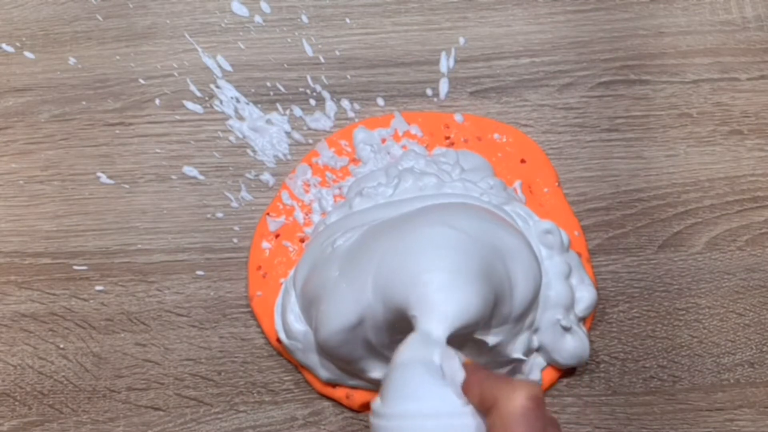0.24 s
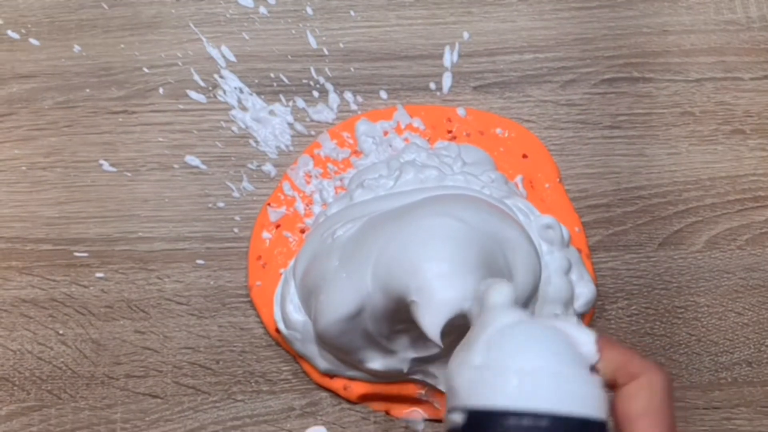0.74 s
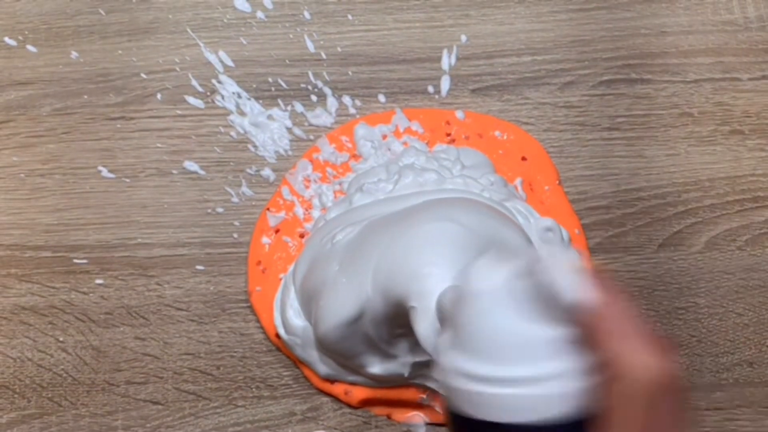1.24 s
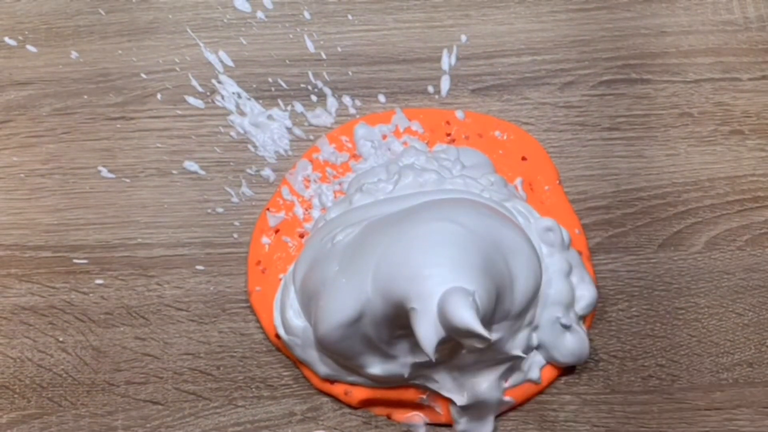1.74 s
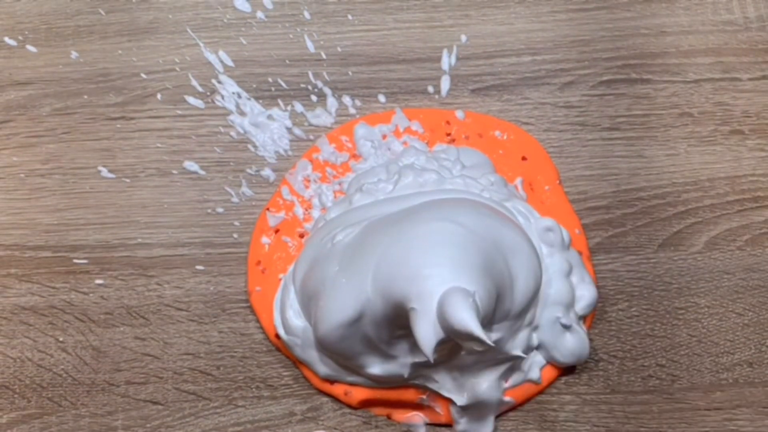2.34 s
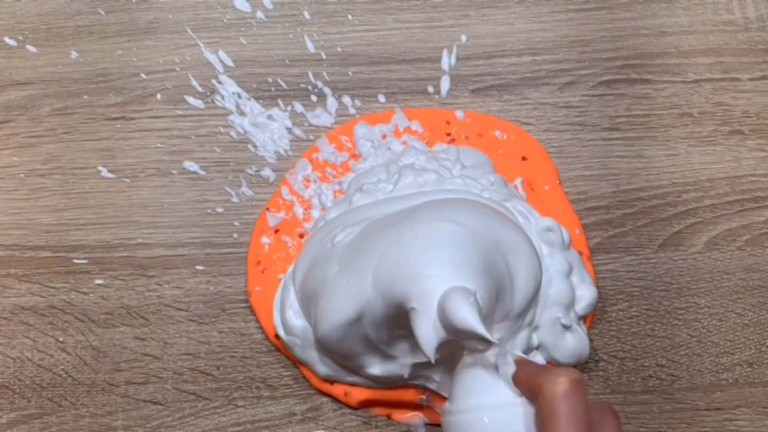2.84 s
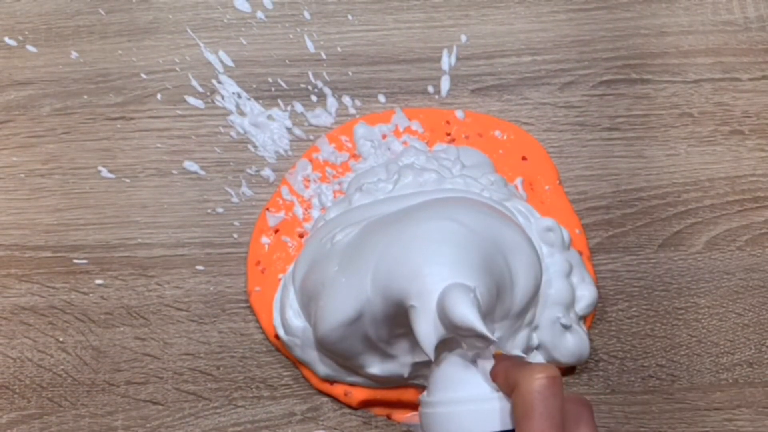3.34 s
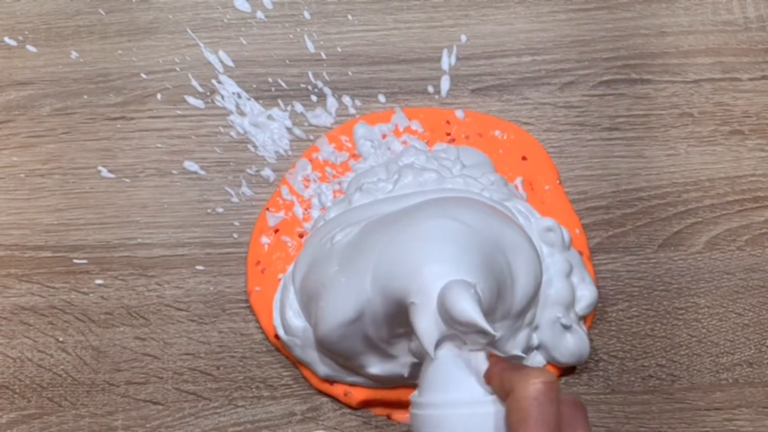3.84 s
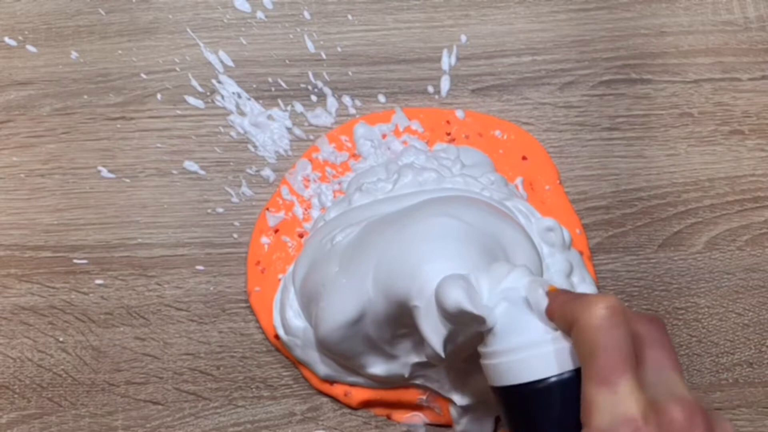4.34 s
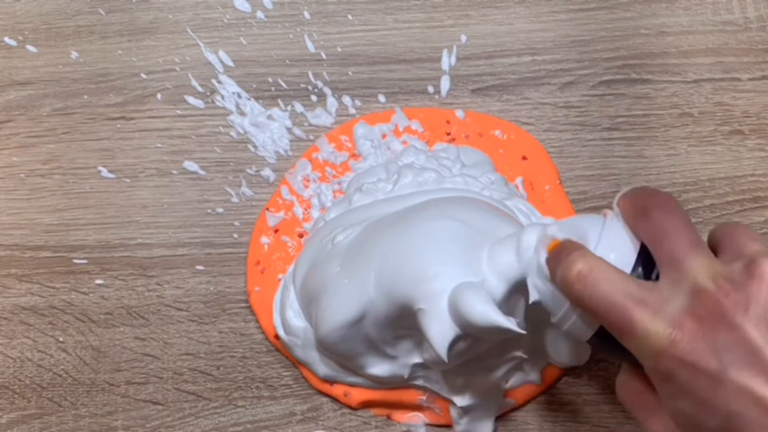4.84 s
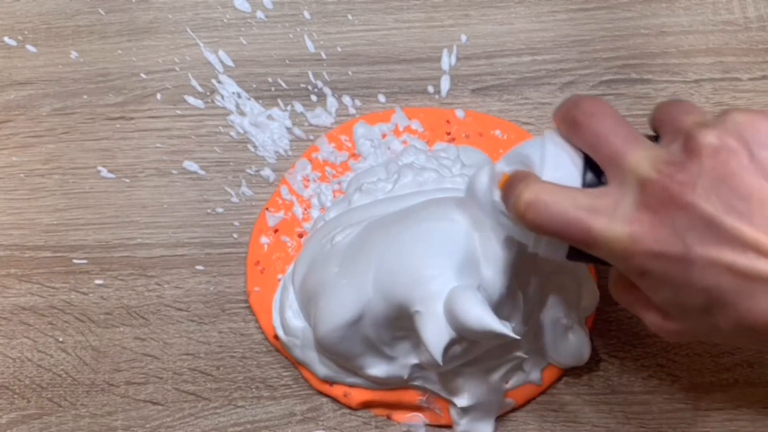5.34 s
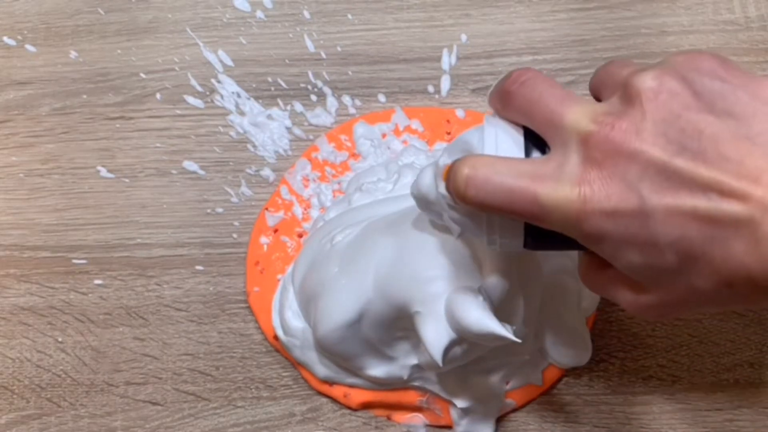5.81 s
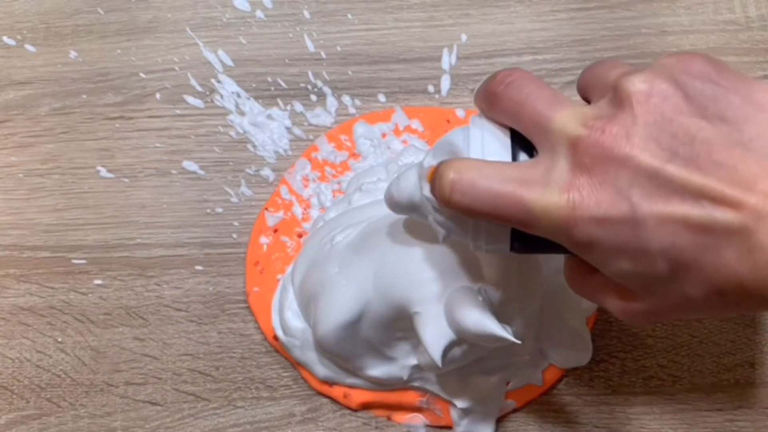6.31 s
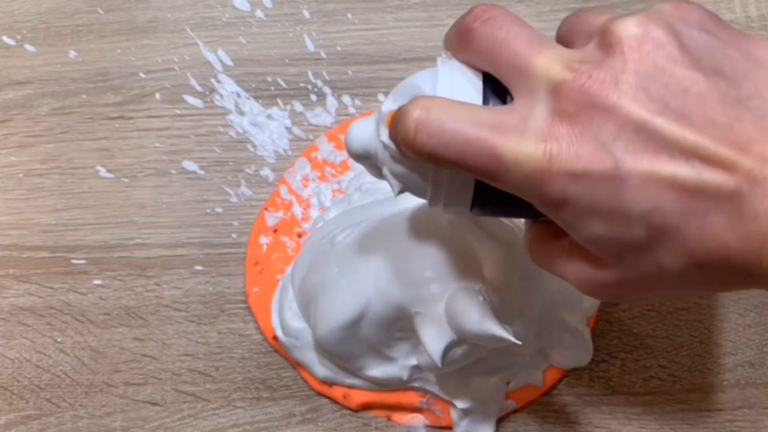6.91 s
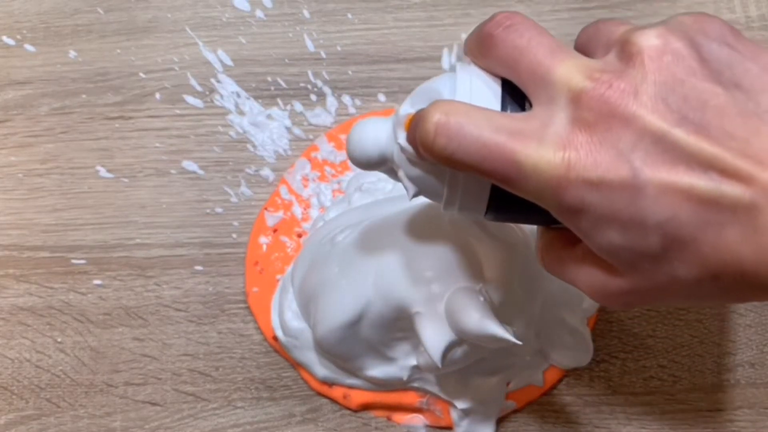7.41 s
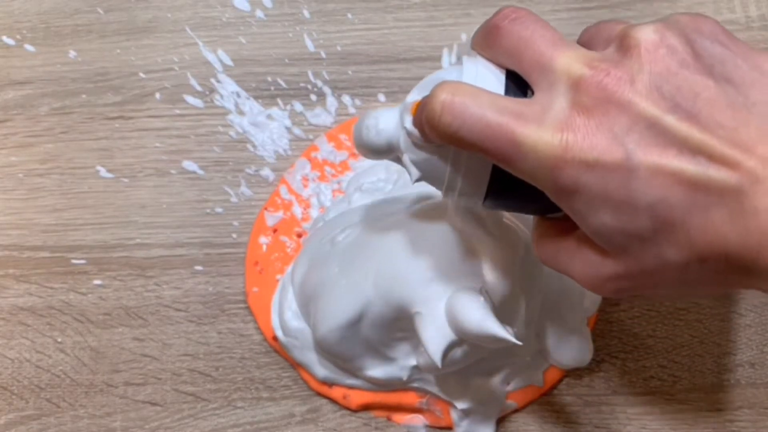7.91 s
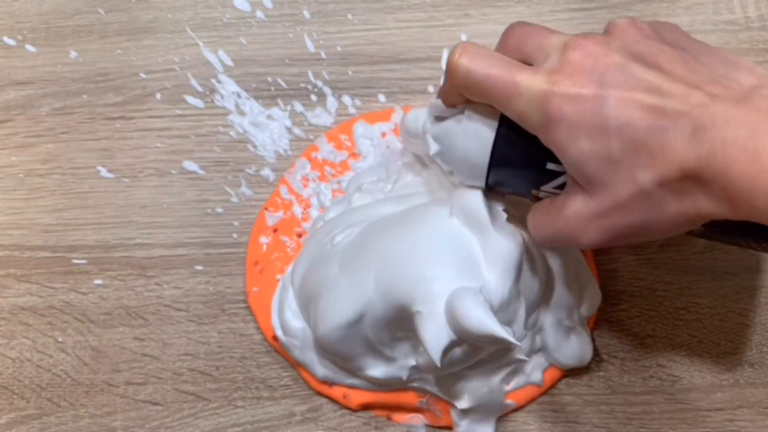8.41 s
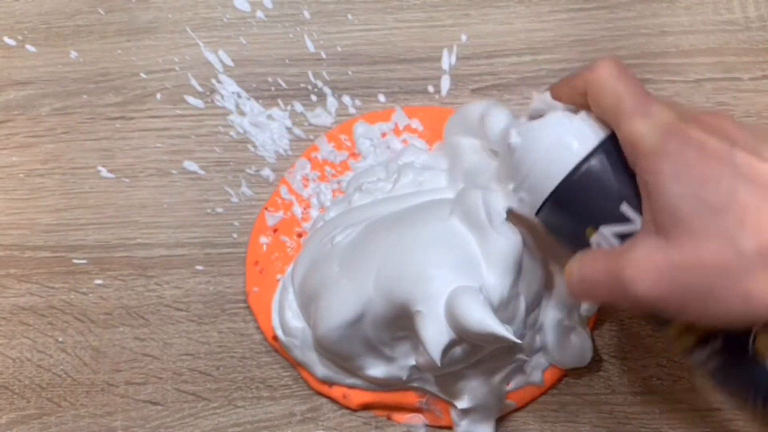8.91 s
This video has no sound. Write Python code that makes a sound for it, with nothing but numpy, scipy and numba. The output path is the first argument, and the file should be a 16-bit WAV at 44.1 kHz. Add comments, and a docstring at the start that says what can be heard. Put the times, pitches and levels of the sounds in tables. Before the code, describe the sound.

Foam rushes from a pressurised can over a table, bright hiss mixed with wet froth. It cuts off after a sputter, leaving small plastic clicks, a liquid slosh and faint room hum. The second, longer spray starts bubbly and crackling, calms to hissing with thin faint whistles, and ends in a sharp splutter and handling noise. A muffled engine drone from outside grows throughout the latter half. Close, dry phone pickup.

```python
"""Gas hisses close by and froth gurgles: a can sprays foam onto a soft mound on a table under a phone microphone.
Noise through drifting resonances makes hiss and gurgle; gliding rings and short noises make bursts and snaps.
Ringing knocks click the cap, and bands of noise slosh and brush the can, with echoes of table and walls.
Farther off, outside the walls, a heavy vehicle draws near: wavering low tones and swelling rumble noise.
Mains hum and room hiss lie beneath; the two microphone ports differ in delay and colour."""
import sys
import numpy as np
from scipy import signal
from scipy.fft import rfft, irfft
from scipy.io import wavfile
from scipy.ndimage import uniform_filter1d, map_coordinates
from numba import njit

SR = 44100
rng = np.random.default_rng(int(sys.argv[2]) if len(sys.argv) > 2 else 0)


def store_pcm(level_fs):
    """Save levels as 16-bit WAV."""
    pcm = np.round(np.clip(level_fs, -1, 1) * 32767).astype(np.int16)
    wavfile.write(sys.argv[1], SR, np.atleast_2d(pcm).T)


N = 403956
T = np.arange(N) / SR  # s

# valve presses, the first already under way: opens t/s, closes t/s
VALVE_PRESSES = [(-.2, 0.732), (2.698, 8.9)]
# flow through the nozzle: t/s, hiss level/dB, wet hiss over it level/dB
NOZZLE_FLOW = [(0.02, -22, -16), (0.168, -24.5, -13.5), (0.208, -26, -15.5), (0.326, -27.5, -11.5),
               (0.432, -23, -10), (0.66, -24, -5), (2.8, -22, -7), (2.85, -30, -2.5), (2.88, -26.5, -3.5),
               (3.0, -27.5, -9), (4.46, -28.5, -4), (4.49, -27.5, -8.5), (5.01, -32, -5),
               (5.36, -26, -12.5), (5.58, -34, -4.5), (5.77, -24, -13.5), (5.92, -31.5, -9.5),
               (6.12, -28.5, -7.5), (6.91, -33, -6.5), (6.97, -30.5, -10.5), (7.06, -34, -6.5),
               (7.48, -35, -5.5), (7.54, -31, -10), (8.01, -37, -3.5), (8.27, -32, -9),
               (8.82, -28.5, -11.5)]
# nozzle resonances before drift: f/Hz (the first slides instead), nominal width/Hz, base level/dB
NOZZLE_MODES = [(7250, 1100, 0), (8400, 1200, -1), (9450, 800, 4), (10100, 600, -8), (11200, 1000, -25),
                (12200, 800, -25), (15000, 2500, -32)]
# hiss colour as froth reshapes the nozzle: t/s, lowest resonance f/Hz,
# level/dB added to the second resonance, level/dB added to the third and fourth
HISS_COLOUR = [(0.02, 7220, -2.5, -9), (0.36, 7140, -3, -3.5), (0.46, 7400, -0.5, -10),
               (0.71, 7550, -2.5, -13), (2.78, 7140, 1.5, -5), (3.28, 7200, -1.5, -1.5),
               (4.39, 7080, 2, 1.5), (4.68, 7200, 1, -2.5), (4.93, 7040, 1.5, 2), (5.35, 7280, -6.5, -6),
               (5.59, 7100, 3, 0.5), (5.74, 7230, -3, -5), (5.92, 7230, 0, -11), (6.36, 7320, -1.5, -5.5),
               (6.73, 7200, 2.5, -7), (6.85, 7470, 1, 0.5), (6.95, 7450, 4.5, -5), (7.99, 7500, 0, 1.5),
               (8.19, 7200, 2, -4.5), (8.78, 7400, 1.5, -6), (8.88, 7240, 0, -10)]
# wet hiss resonances, upper and lower: f/Hz, nominal width/Hz, relative level/dB
WET_HIGH_MODES = [(4223, 750, -3), (4890, 1100, -2.5), (5360, 1040, -0.5), (6200, 570, -5)]
WET_LOW_MODES = [(2795, 760, 3.5), (3420, 1120, 5.5)]
# spout resonances, deep, middle and high: f/Hz, nominal width/Hz, relative level/dB
SPOUT_DEEP_MODES = [(579, 365, 0.94), (852, 133, 0.056)]
SPOUT_MID_MODES = [(1162, 253, 0)]
SPOUT_HIGH_MODES = [(1498, 230, 7.2), (1910, 1090, 0.9)]
# froth in the spout: t/s, deep level/dB, middle level/dB, high level/dB
GURGLE_LEVELS = [(0.02, -30.5, -57, -50), (0.034, -48, -52, -49), (0.06, -28, -60, -50),
                 (0.132, -30.5, -40, -45), (0.28, -46, -43.5, -43), (0.578, -34.5, -35, -39),
                 (0.64, -40, -33, -42), (0.69, -33, -27, -37), (0.72, -35, -37, -45),
                 (2.75, -35.5, -31.5, -33.5), (2.92, -39.5, -55, -33), (3.09, -33, -43.5, -40),
                 (3.5, -32, -44, -39), (3.75, -26.5, -35.5, -40.5), (3.84, -39, -39, -44),
                 (3.94, -27, -42, -35.5), (4.1, -31.5, -42, -36), (4.21, -37, -46, -39),
                 (4.43, -36, -30, -34.5), (4.5, -43, -44, -52), (4.54, -33.5, -34, -29),
                 (4.57, -39, -51, -57), (4.59, -31, -31, -32.5), (4.65, -41, -44, -51),
                 (4.71, -32.5, -45, -43), (4.76, -31, -37, -39), (4.88, -32.5, -46, -48),
                 (4.91, -24.5, -39, -31), (4.93, -30, -35, -40), (5.0, -37, -46, -43),
                 (5.11, -28, -37.5, -48), (5.2, -37, -37, -48), (5.22, -32.5, -36, -45),
                 (5.64, -38.5, -44, -44.5), (5.74, -36, -38, -41), (5.83, -46, -47, -38),
                 (5.85, -54, -38, -43), (5.98, -45, -52, -43), (6.19, -37.5, -39, -45),
                 (6.22, -39, -50, -50), (6.48, -36, -36.5, -44), (6.65, -41.5, -41, -48),
                 (6.77, -52, -42, -47), (6.83, -42, -35.5, -42), (6.92, -34.5, -36.5, -46.5),
                 (7.29, -39, -45, -49.5), (7.5, -27.5, -31, -41), (7.53, -34.5, -42, -42),
                 (8.08, -37, -43.5, -52), (8.21, -33, -42.5, -46), (8.42, -38.5, -52.5, -51),
                 (8.83, -34, -40.5, -42), (8.86, -37, -36, -42.5)]
# spurts of wet froth, the last one by far the strongest: centre t/s, length/s, rise level/dB before sharing
SPURTS = [(0.683, 0.044, 8.5), (2.896, 0.15, -3), (4.404, 0.052, 3), (4.58, 0.044, 4.5), (5.748, 0.06, 9),
          (6.457, 0.11, 4), (6.885, 0.2, 0), (7.47, 0.074, -1), (8.851, 0.059, 15.5)]
# share of a spurt's dB taken by each layer: hiss, upper wet, lower wet, deep, middle, high [ratio]
SPURT_SHARES = [0.029, 0.87, 0.7, 0.12, 0.22, 0.28]
# narrow whistles as froth narrows the nozzle: from t/s, to t/s, from f/Hz, to f/Hz, level/dB
WHISTLES = [(6.0, 6.75, 1150, 1170, -46), (6.75, 7.25, 1170, 1190, -43), (6.3, 8.1, 3210, 3290, -53),
            (6.8, 8.1, 2930, 2980, -51), (5.8, 6.6, 2880, 2820, -53), (5.85, 7.8, 4200, 4290, -50.5),
            (7.25, 7.65, 930, 950, -44), (.692, .733, 4550, 4600, -29), (.55, .7, 4100, 4400, -36)]
# big pockets of gas bursting in the froth: t/s, envelope peak level/dB, starting f/Hz
BURSTS = [(2.955, -25, 681), (3.018, -24, 580), (3.121, -21, 1030), (3.189, -24, 608), (3.218, -24, 581),
          (3.246, -19.5, 614), (3.291, -19, 626), (3.444, -28, 910), (3.483, -31, 624), (3.565, -20, 613),
          (3.662, -20, 635), (3.686, -20, 692), (3.708, -21, 607), (3.732, -14, 620), (3.82, -28, 614),
          (3.868, -20, 695), (3.973, -22, 719), (4.256, -19, 1200), (4.279, -25, 1300), (4.398, -23, 1200),
          (4.535, -19, 1230), (4.581, -20.5, 610), (4.695, -18, 600), (4.716, -29, 668), (4.741, -18, 665),
          (4.765, -13.5, 690), (4.846, -30, 590), (4.899, -18, 856), (5.034, -20, 610), (5.096, -17, 800),
          (5.131, -20, 840), (5.215, -16.5, 690), (5.312, -19, 575), (5.37, -22, 640), (5.433, -24, 594),
          (5.478, -28, 654), (5.519, -20, 598), (5.686, -26, 486), (6.384, -21, 594), (6.827, -22, 1250),
          (6.871, -28, 1090), (6.926, -21, 1110), (7.159, -36, 1190), (7.25, -24, 974), (7.462, -27, 530),
          (7.74, -22, 470), (8.476, -23, 760), (8.725, -18.5, 700), (8.832, -23, 625), (8.869, -15, 1260)]
# crisp snaps of the foam skin: t/s, peak level/dB, centre f/Hz
SNAPS = [(2.9562, -16, 1540), (3.016, -24, 1600), (3.99, -31, 1540), (4.05, -27, 1500), (4.1045, -15, 1560),
         (4.145, -24, 1700), (4.1887, -14, 1540), (4.2807, -15, 1400), (4.398, -23, 1300),
         (4.5405, -33, 1500), (4.583, -32, 1530), (4.766, -28, 1000), (4.8988, -12.5, 2000),
         (5.035, -18, 700), (5.728, -22, 1270), (6.453, -24, 1130), (7.251, -24, 985)]
# clicks of valve, cap and can under the hand:
# t/s, nominal body level/dB, crack over it level/dB, body f/Hz
KNOCKS = [(0.797, -42, 9, 1200), (0.849, -32, -5, 1310), (1.076, -34, -15.5, 970), (1.14, -35.5, -21, 1280),
          (1.506, -27.5, -16.5, 1440), (1.628, -17.5, -26.5, 1340), (2.134, -38.5, -19, 1690),
          (2.2294, -27, -28, 1050), (2.35, -36.5, -20, 1860), (2.588, -44.5, -8, 1250),
          (8.991, -46, 5, 1130), (9.054, -24.5, -11.5, 1214)]
# ringing of the can body: multiple of the body pitch [ratio], level/dB, t60/s
CAN_BODY_MODES = [(1, 5.5, 0.02), (1.4, 5, 0.0099), (1.9, -1, 0.012), (2.6, 3, 0.0037)]
# ringing of the can top: nominal f/Hz before it is scaled in knocks(), level/dB, t60/s
CAN_TOP_MODES = [(4600, 12.5, 0.021), (7460, -9, .008)]
# froth sloshing in the can: t/s, length/s, level/dB
SLOSHES = [(1.528, 0.039, -39), (1.563, 0.031, -27), (1.601, 0.053, -52), (2.215, 0.048, -43),
           (2.27, 0.025, -52), (2.3, .045, -52), (2.364, 0.011, -43.5), (8.906, 0.15, -68)]
# fingers brushing the can: t/s, length/s, level/dB
BRUSHES = [(.74, 0.061, -54), (.805, 0.055, -42), (.855, 0.033, -42), (1.87, .04, -47.5),
           (2.084, 0.047, -43.5), (2.252, 0.12, -44.5), (2.58, 0.075, -54.5), (9.003, 0.57, -45.5)]
# lasting vehicle tones: f/Hz midway through the pitch shift, share of the shift [ratio, negative rises]
VEHICLE_TONES = [(34, 0.4), (74, 0.99), (93.5, 0.98), (115, -.7)]
# levels of those tones at uneven moments, jumping up and down: t/s, then level/dB of each tone in turn
VEHICLE_TONE_LEVELS = [(0.0, -41, -40, -33, -53), (0.07, -44, -34.5, -36, -40), (1.04, -35, -49, -40, -38),
                       (2.04, -43, -41, -36, -51), (3.49, -34, -39, -31.5, -41), (3.82, -39, -33, -33, -34),
                       (4.03, -26.5, -40, -19, -49), (4.15, -28, -38, -34.5, -32),
                       (4.89, -32, -34.5, -31, -40), (5.02, -42, -51, -37, -46),
                       (5.27, -30, -30, -21.5, -34), (5.38, -28, -50, -26.5, -37),
                       (5.43, -36, -34, -30, -35), (5.94, -36, -22, -19.5, -27),
                       (6.04, -23, -18, -17.5, -30), (6.22, -20.5, -29, -35, -36),
                       (6.45, -23, -14, -17, -27), (6.62, -18.5, -20.5, -26, -23),
                       (6.98, -23.5, -28, -13.5, -29), (7.18, -26, -25, -29.5, -29),
                       (7.29, -35, -29, -17, -27.5), (7.59, -15, -22, -19.5, -23.5),
                       (7.8, -26, -14, -15, -31), (7.98, -20, -27, -30, -13.5),
                       (8.13, -20, -19, -13.5, -27), (8.18, -16, -24, -21, -14),
                       (8.51, -28, -20, -18.5, -16), (8.95, -17, -25, -17.5, -21),
                       (9.0, -16, -26, -29, -27), (9.15, -21, -14.5, -11, -18.5)]
# tones that come and go: from t/s, to t/s, from f/Hz, to f/Hz, nominal level/dB
BRIEF_TONES = [(1.065, 1.393, 177, 177, -30.5), (1.396, 2.276, 154.4, 155.1, -30.5),
               (1.55, 2.296, 64.7, 65.5, -29), (5.1, 6.4, 155, 146, -29), (7.55, 8.44, 254.7, 255, -28),
               (8.8, 9.2, 262, 262, -31), (6.85, 7.0, 178, 178, -29), (7.25, 7.42, 178, 178, -28),
               (8.3, 8.75, 328, 328, -34), (7.29, 8.88, 125.4, 123.3, -22)]
# nearness of the vehicle: t/s, reference rumble level/dB
APPROACH = [(0.0, -34.5), (0.43, -33.5), (2.14, -28.5), (2.19, -31), (6.1, -28.5), (7.19, -27), (8.27, -21),
            (8.32, -27), (9.16, -22)]
# rumble below 45 Hz, up to 140, up to 260: offset from the starting level/dB, growth [dB per dB of approach]
RUMBLE_BANDS = [(-13, 1.5), (-7, 1.5), (-4, 1.0)]
# low murmur above 260 Hz, partly from the spray, before its swell: t/s, level/dB
MURMUR_LEVELS = [(0.0, -32.5), (0.12, -28), (0.18, -40), (0.25, -28), (0.48, -35), (0.61, -28.5),
                 (0.69, -34.5), (2.68, -44.5), (2.98, -32), (3.11, -42), (3.54, -36), (6.75, -35.5),
                 (7.72, -28.5), (9.15, -32)]
# spectral shape of rumble and murmur: f/Hz, relative level/dB
RUMBLE_COLOUR = [(12, -5), (26, 17.5), (38, 9), (55, 8.5), (95, 8), (140, 5), (180, 1.5), (250, 0),
                 (320, -4), (400, -16), (600, -24.5), (1000, -78)]
# likeness of rumble and murmur at left and right: f/Hz, likeness [0 to 1]
RUMBLE_LIKENESS = [(30, .99), (100, .93), (200, .7), (400, .6)]
# spectral shape of the room hiss: f/Hz, relative level/dB
ROOM_HISS_COLOUR = [(300, 1.5), (600, -0.5), (1000, -8), (2000, -13.5), (4500, -15), (8000, -20),
                    (16000, -23)]
# echoes of table and walls: f/Hz, level/dB relative to the direct sound
ECHO_COLOUR = [(300, -11.5), (650, -4), (900, -5), (2000, 0), (3500, -2), (5500, -1), (7000, -12),
               (12000, -22)]
# delay between the microphone ports: f/Hz, lag of the left port [samples]
PORT_LAG = [(150, -2), (400, 2.5), (1000, 1.8), (2500, 1.8), (4400, 2.6), (5500, 4.4), (6600, 6.1),
            (7400, 6.0), (10500, 6.3), (13500, 6.5)]
# colour of the microphone ports: f/Hz, left minus right level/dB
PORT_TILT = [(60, 1.2), (300, 1.5), (700, 2), (1300, 4.5), (2400, 2.5), (4400, -1), (8000, .2)]

# valve and the froth that gurgles on in the spout after it shuts
OPEN_S, CLOSE_DB_PER_S = 0.17, 1100
DRIBBLE_DB, DRIBBLE_DB_PER_S = -9, 50
# centre drifts are shares of the frequency
NOZZLE_DRIFT, WET_DRIFT = .008, .018
HISS_FLICKER_DB, MID_FLICKER_DB = 1, 2
DROPLET_CLUMPS_DB, HISS_CLUMPS_DB = 1.6, 2
WET_LOW_DB = -8.5  # lower wet hiss over the upper
MOUND_ECHO_S, MOUND_ECHO_DB, MOUND_WANDER = .0029, -10, .05  # hiss bounced off mound and hand
BLURT_DB, BLURT_S = 0.5, 0.02  # extra gurgle for a moment after each big burst
# whistle width and fade are shares of frequency and length
WHISTLE_WIDTH_SHARE, WHISTLE_FLICKER_DB, WHISTLE_FADE = .045, 3, .2
SNAP_S = 0.0026
CRACK_S, CRACK_TAIL_S, CRACK_TAIL_DB = .0013, .007, -16
SLOSH_HZ, SLOSH_WIDTH_HZ = 1246, 270
BRUSH_HZ, BRUSH_WIDTH_HZ = 4930, 4300
SHIFT_S, SHIFT_SPAN_S, PITCH_SHIFT = 5.8, 1.9, .058
WAVER_DB, WAVER_PER_S, WAVER_HZ, WAVER_PAN_DB_PER_HZ = 2.8, 8, 1.2, -0.016
RUMBLE_SWELL_DB = 1.3
MAINS_HZ, MAINS_DB, ROOM_HISS_DB = 49.4, -37, -44.5
ROOM_T60_S, ROOM_CHANGES_S = 0.13, .12
TOP_HZ = 16000


def undb(db):
    """dB to gain."""
    return 10 ** (np.asarray(db) / 20)


def unit(x):
    """Scale to rms 1."""
    return x / np.sqrt(np.mean(x ** 2))


def along(table, hz):
    """Read a (f/Hz, value) table on a log axis."""
    table_hz, values = np.transpose(table)
    return np.interp(np.log(hz + 1), np.log(table_hz), values)


def curves(table):
    """Read the columns of a (t/s, value, ..) table at every sample."""
    s, *columns = np.transpose(table)
    return [np.interp(T, s, column) for column in columns]


@njit
def svf(x, hz, width):
    """State-variable band-pass with a moving centre, gain 1 there."""
    y, band, low = np.empty(len(x)), 0., 0.
    for i in range(len(x)):
        g, damping = np.tan(np.pi * hz[i] / SR), width / hz[i]
        v = (band + g * (x[i] - low)) / (1 + g * (g + damping))
        band, low, y[i] = 2 * v - band, low + 2 * g * v, damping * v
    return y


def steep_band(x, hz, width):
    """Two equal band-passes in a row, for steeper skirts."""
    return svf(svf(x, hz, width), hz, width)


def walk(rate):
    """Random levels held 1 / rate s and slewed twice; spread near 1."""
    k = int(SR / rate)
    held = np.repeat(rng.standard_normal(N // k + 1), k)
    return 1.333 * uniform_filter1d(uniform_filter1d(held, k), k)[:N]


def add(out, s, piece):
    """Mix a piece in at time s."""
    i = int(s * SR)
    out[i:i + len(piece)] += piece[:N - i]


def valve(close_db_per_s):
    """Gain of the flow: swells as the button goes down, dies away once it is let go."""
    gain = 0
    for opens, closes in VALVE_PRESSES:
        swell = np.clip((T - opens) / OPEN_S, 0, 1) ** 0.78
        gain = gain + swell * undb(np.clip(close_db_per_s * (closes - T), -150, 0))
    return gain


def sputter(per_s, spread_db, smooth, clumps_db):
    """Bubbles popping at random moments, in clumps and of bounded size, over a share of plain flow noise."""
    size = undb(spread_db * np.minimum(rng.exponential(size=N), 4) + clumps_db * walk(40))
    popping = rng.random(N) < per_s / SR
    return unit(popping * size * rng.standard_normal(N)) + smooth * rng.standard_normal(N)


def cavity(drive, modes, drift, flicker_db, rate):
    """Steep resonances whose centres drift and whose levels flicker as froth reshapes the passage."""
    out = 0
    for hz, width, db in modes:
        centre = hz * (1 + drift * walk(5.5))
        # the same pops, but each pocket has turbulence of its own
        own = drive * rng.choice([-1., 1.], size=N)
        out = out + undb(db + flicker_db * walk(rate)) * steep_band(own, centre, 0.97 * width)
    return unit(out)


def nozzle():
    """The hiss: its lowest resonance slides, the next three swell and fade, and an echo off the mound combs it."""
    low_hz, second_db, third_db = curves(HISS_COLOUR)
    modes = [(low_hz, *NOZZLE_MODES[0][1:])]
    lifts_db = [second_db, third_db, third_db, 0, 0, 0]
    for (hz, width, db), lift_db in zip(NOZZLE_MODES[1:], lifts_db):
        modes.append((hz, width, db + lift_db))
    turbulence = sputter(per_s=2700, spread_db=2.0, smooth=0.97, clumps_db=HISS_CLUMPS_DB)
    hiss = cavity(turbulence, modes, NOZZLE_DRIFT, flicker_db=HISS_FLICKER_DB, rate=16)
    late = T - MOUND_ECHO_S * (1 + MOUND_WANDER * walk(1.3))
    return unit(hiss + undb(MOUND_ECHO_DB) * map_coordinates(hiss, [late * SR], mode="mirror"))


def jet_and_froth():
    """Three hiss layers and three gurgle layers of the jet follow valve, flow, bursts and spurts."""
    froth = sputter(per_s=1300, spread_db=2.5, smooth=0.44, clumps_db=1.0)
    droplets = sputter(per_s=2000, spread_db=4.0, smooth=0.79, clumps_db=DROPLET_CLUMPS_DB)
    layers = np.array([nozzle(),
                       cavity(droplets, WET_HIGH_MODES, WET_DRIFT, flicker_db=1.0, rate=14),
                       cavity(droplets, WET_LOW_MODES, WET_DRIFT, flicker_db=1.5, rate=14),
                       cavity(froth, SPOUT_DEEP_MODES, 0.085, flicker_db=0.5, rate=17),
                       cavity(froth, SPOUT_MID_MODES, 0.037, flicker_db=MID_FLICKER_DB, rate=24),
                       cavity(froth, SPOUT_HIGH_MODES, 0.0052, flicker_db=1.5, rate=20)])
    jet = valve(CLOSE_DB_PER_S)
    spout = np.maximum(jet, undb(DRIBBLE_DB) * valve(DRIBBLE_DB_PER_S))
    hiss_db, wet_db = curves(NOZZLE_FLOW)
    upper_wet_db = hiss_db + wet_db
    burst_s = [s for s, *_ in BURSTS]
    since_burst = T - np.array([-1] + burst_s)[np.searchsorted(burst_s, T)]
    blurt_db = BLURT_DB * np.exp(-(since_burst / BLURT_S) ** 2)
    gurgle_db = np.array(curves(GURGLE_LEVELS)) + blurt_db * np.array([[1], [.6], [.3]])
    spurt_db = sum(db * np.exp(-(2 * (T - s) / length) ** 2) for s, length, db in SPURTS)
    level_db = np.array([hiss_db, upper_wet_db, upper_wet_db + WET_LOW_DB, *gurgle_db])
    level_db = level_db + np.outer(SPURT_SHARES, spurt_db)
    return (np.array([jet] * 3 + [spout] * 3) * undb(level_db) * layers).sum(axis=0)


def tone(hz, db):
    """A low tone that wavers in pitch, level and, the higher it is, side."""
    phase = 2 * np.pi * (np.cumsum(hz + WAVER_HZ * walk(9)) / SR + rng.random())
    pan_db = WAVER_PAN_DB_PER_HZ * hz * walk(1.95) * np.array([[.5], [-.5]])
    return np.sqrt(2) * undb(db + WAVER_DB * walk(WAVER_PER_S) + pan_db) * np.sin(phase)


def drone():
    """Vehicle tones, lasting ones shifting smoothly in pitch (most sink), others coming and going."""
    out = 0
    shift = PITCH_SHIFT * np.tanh((T - SHIFT_S) / SHIFT_SPAN_S)
    for (hz, share), db in zip(VEHICLE_TONES, curves(VEHICLE_TONE_LEVELS)):
        out = out + tone(hz * (1 - share * shift), db)
    for start, end, from_hz, to_hz, db in BRIEF_TONES:
        fade = np.clip(np.minimum(T - start, end - T) / 0.39 + .5, 0, 1)
        out = out + fade * tone(np.interp(T, [start, end], [from_hz, to_hz]), db)
    return out


def wide_noise(colour, alike):
    """Spectra of coloured noise on two channels: shared mid and opposed side set their likeness."""
    hz = np.fft.rfftfreq(N, 1 / SR)
    mid, side = rfft(rng.standard_normal((2, N))) * undb(along(colour, hz))
    c = np.clip(along(alike, hz), 0, 1)
    return np.array([np.sqrt(1 + c) * mid + sign * np.sqrt(1 - c) * side for sign in (1, -1)]), hz


def rumble_and_murmur():
    """Noise in four bands: three of rumble follow the vehicle's nearness, the murmur above has its own levels."""
    spec, hz = wide_noise(RUMBLE_COLOUR, RUMBLE_LIKENESS)
    # power shares of the bands are differences of successive low-pass curves
    under = [0] + [1 / (1 + (hz / edge) ** 6) for edge in (45, 140, 260)] + [1]
    shares = np.diff(np.broadcast_arrays(*under), axis=0)
    near_db, = curves(APPROACH)
    levels_db = [near_db[0] + db + growth * (near_db - near_db[0]) for db, growth in RUMBLE_BANDS]
    levels_db += curves(MURMUR_LEVELS)
    out = 0
    for share, level_db in zip(shares, levels_db):
        band = unit(irfft(spec * np.sqrt(share), N))
        out = out + undb(level_db + RUMBLE_SWELL_DB * walk(3.59)) * band
    return out


def mains_hum():
    """One steady sine, alike at both ports."""
    return undb(MAINS_DB) * np.sqrt(2) * np.sin(2 * np.pi * MAINS_HZ * T)


def room_hiss():
    """Steady coloured noise whose likeness at the two ports varies with frequency."""
    spec, _ = wide_noise(ROOM_HISS_COLOUR, [(300, 0.84), (3000, 0.023), (8000, 1.0)])
    return undb(ROOM_HISS_DB) * unit(irfft(spec, N))


def room(x):
    """Decaying echoes of table and walls, different at each port and changing as the can moves about."""
    hop, t = int(SR * ROOM_CHANGES_S), T[:int(SR * .3)]
    out, padded = np.zeros((2, N + 4 * hop + len(t))), np.pad(x, (hop, 2 * hop))
    window = np.sqrt(np.hanning(2 * hop))  # overlapping stretches keep their power
    for i in range(0, N + hop, hop):
        decay = np.exp(-np.log(1000) * t / ROOM_T60_S) * (t > .005)
        tail = rng.standard_normal((2, len(t))) * decay
        tail = tail / np.sqrt((tail ** 2).sum(axis=1, keepdims=True))
        echo = signal.fftconvolve([padded[i:i + 2 * hop] * window], tail, axes=1)
        out[:, i:i + echo.shape[1]] += echo
    colour = undb(along(ECHO_COLOUR, np.fft.rfftfreq(N, 1 / SR)))
    return irfft(rfft(out[:, hop:hop + N]) * colour, N)


def whistles():
    """Narrow bands of hiss that creep in pitch and flicker in level."""
    out = 0
    for start, end, from_hz, to_hz, db in WHISTLES:
        length = end - start
        centre = np.interp(T, [start, end], [from_hz, to_hz]) * (1 + 0.0067 * walk(6.9))
        width = max(WHISTLE_WIDTH_SHARE * from_hz, 30 / length)  # a short one is broad
        band = unit(steep_band(rng.standard_normal(N), centre, width))
        fade = np.clip(np.minimum(T - start, end - T) / (WHISTLE_FADE * length) + .5, 0, 1)
        out = out + fade * undb(db + WHISTLE_FLICKER_DB * walk(13)) * band
    return out


def rubbing(table, hz, width):
    """Brushes or sloshes: short rounded stretches of steeply band-passed noise."""
    out = np.zeros(N)
    noise = unit(steep_band(rng.standard_normal(N), np.full(N, 1. * hz), 1. * width))
    for s, length, db in table:
        n = int(length * SR)
        add(out, s, undb(db) * np.hanning(n) ** 0.38 * np.roll(noise, -int(s * SR))[:n])
    return out


def ring(modes, pitch_hz):
    """One blow on a set of modes, each a decaying sine."""
    t = T[:SR // 8]
    return sum(undb(db) * np.sin(2 * np.pi * hz * pitch_hz * t) * np.exp(-np.log(1000) * t / t60)
               for hz, db, t60 in modes)


def knocks():
    """Each knock rings the can body and top and adds a bright crack of decaying noise."""
    out, t = np.zeros(N), T[:SR // 8]
    contact = 1 - np.exp(-t / 0.00097)  # the skin and plastic give a little before they push
    crack_decay = np.exp(-t / CRACK_S) + undb(CRACK_TAIL_DB) * np.exp(-t / CRACK_TAIL_S)
    for s, db, top_db, hz in KNOCKS:
        noise = rng.standard_normal(len(t))
        crack = svf(noise, np.full(len(t), 7000.), 9400.0) * crack_decay
        top = 20.0 * crack + ring(CAN_TOP_MODES, 0.92)
        add(out, s, undb(db) * contact * (ring(CAN_BODY_MODES, hz) + undb(top_db) * top))
    return out


def handling():
    """Fingers brush the can, valve, cap and can knock, and froth sloshes inside."""
    brushes = rubbing(BRUSHES, BRUSH_HZ, BRUSH_WIDTH_HZ)
    return brushes + knocks() + rubbing(SLOSHES, SLOSH_HZ, SLOSH_WIDTH_HZ)


def bursts():
    """Large gas pockets ring for a few cycles and glide up in pitch."""
    out, t = np.zeros(N), T[:SR // 30]
    for s, db, hz in BURSTS:
        cycles = t * hz / 0.98
        envelope = cycles * np.exp(1 - cycles)
        add(out, s, undb(db) * envelope * np.sin(2 * np.pi * hz * t * (1 + 6 * t)))
    return out


def snaps():
    """The foam skin snaps: quickly decaying noise through a broad band-pass."""
    out, t = np.zeros(N), T[:SR // 30]
    for s, db, hz in SNAPS:
        noise = rng.standard_normal(len(t))
        snap = svf(noise * np.exp(-t / SNAP_S), np.full(len(t), 1. * hz), 0.87 * hz)
        add(out, s, undb(db) * snap / np.abs(snap).max())
    return out


def scene():
    """Can and hand close by in the room, the vehicle outside, hum and a steady hiss."""
    can = jet_and_froth() + whistles() + bursts() + snaps()
    hand = handling()
    echoes = room(can + undb(-2.0) * hand)
    low_sounds = drone() + rumble_and_murmur()
    return can + hand + echoes + low_sounds + mains_hum() + room_hiss()


def record(dry):
    """The two microphone ports differ in delay and colour; the loudest swings are rounded and the top is cut."""
    hz = np.fft.rfftfreq(N, 1 / SR)
    # each port takes half of the difference, in opposite directions
    left = undb(along(PORT_TILT, hz) / 2) * np.exp(-1j * np.pi * hz * along(PORT_LAG, hz) / SR)
    ports = np.tanh(irfft(rfft(dry) * np.array([left, 1 / left]), N))
    return signal.sosfilt(signal.ellip(10, .2, 70, TOP_HZ, fs=SR, output="sos"), ports)


dry = scene()
out = record(dry)
store_pcm(out)
```